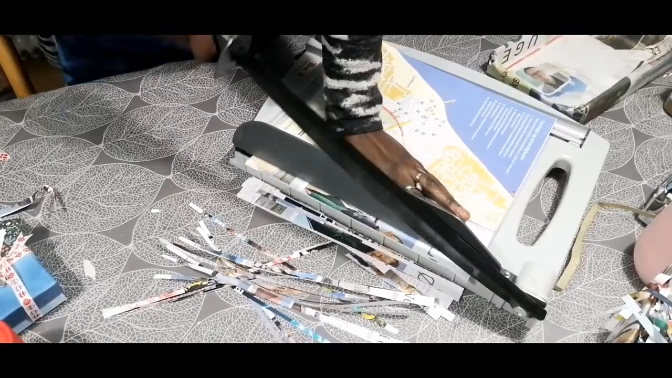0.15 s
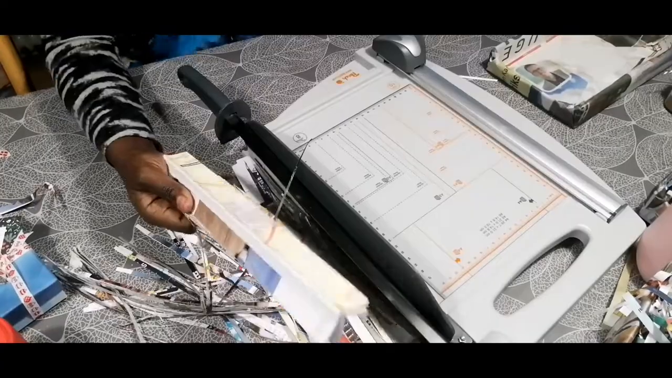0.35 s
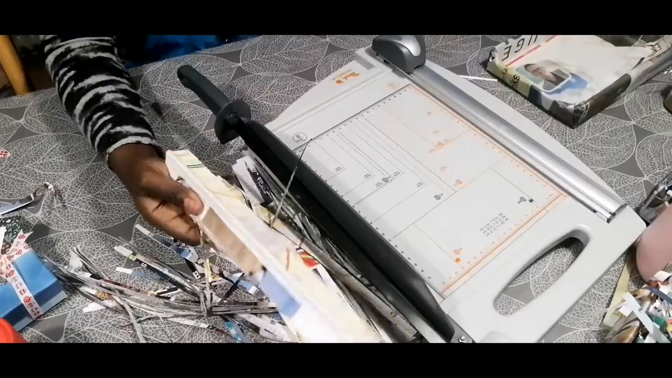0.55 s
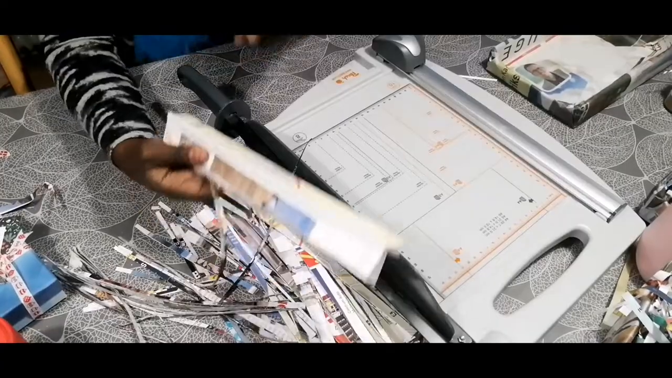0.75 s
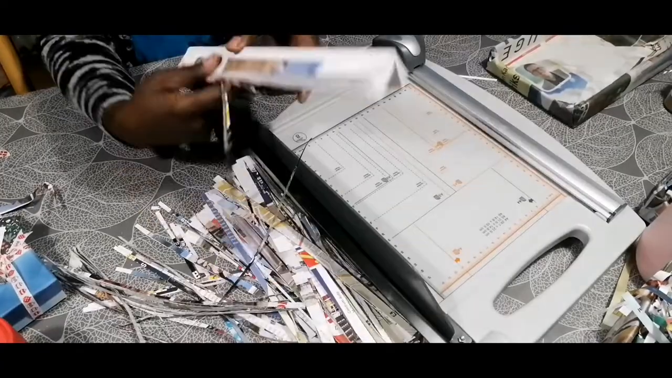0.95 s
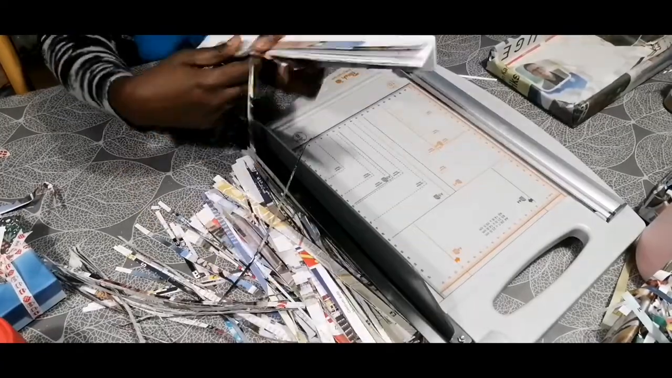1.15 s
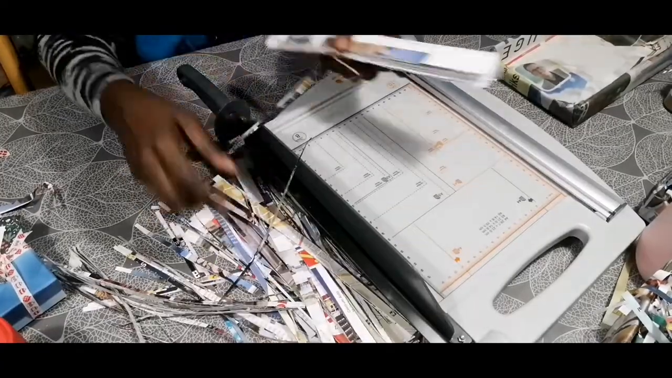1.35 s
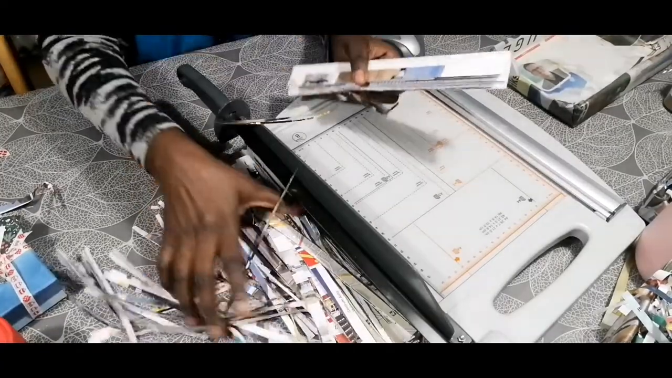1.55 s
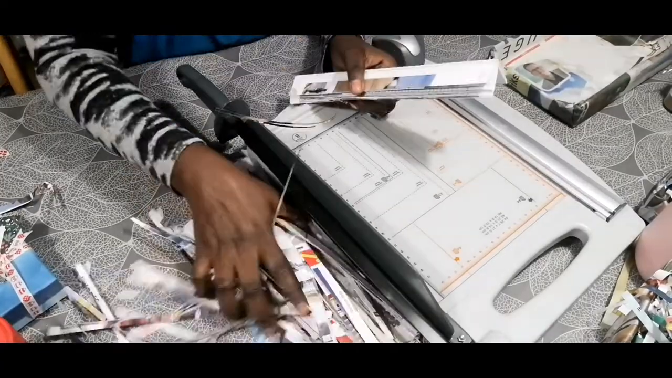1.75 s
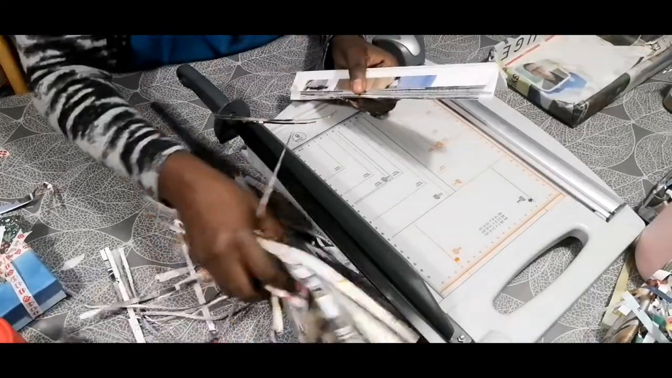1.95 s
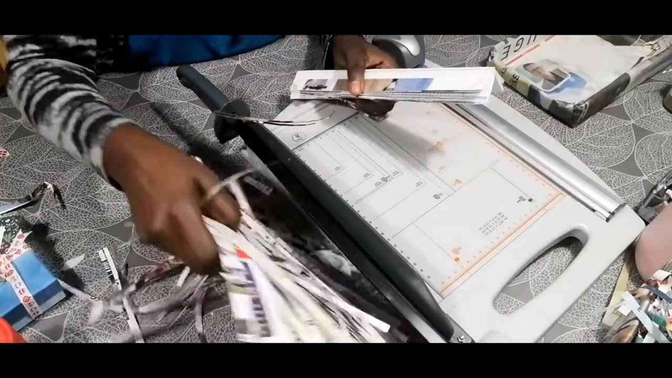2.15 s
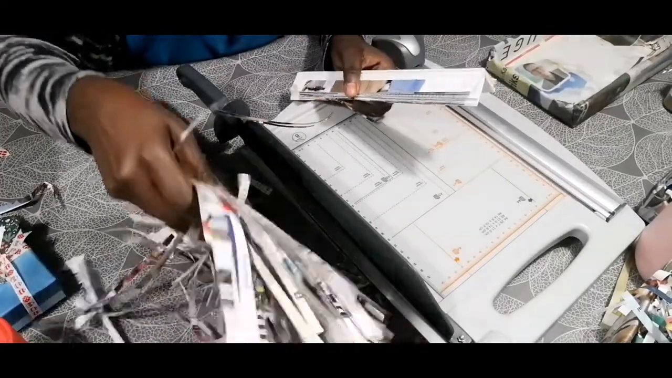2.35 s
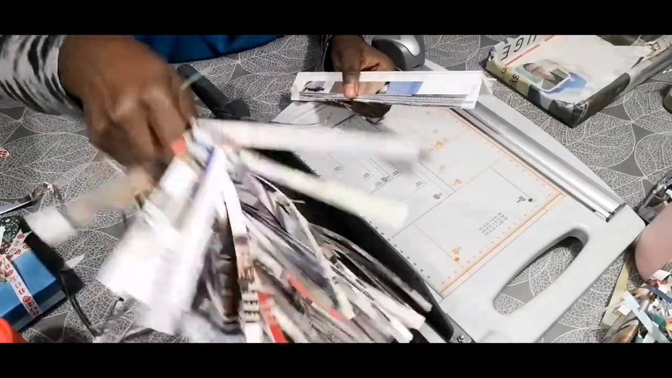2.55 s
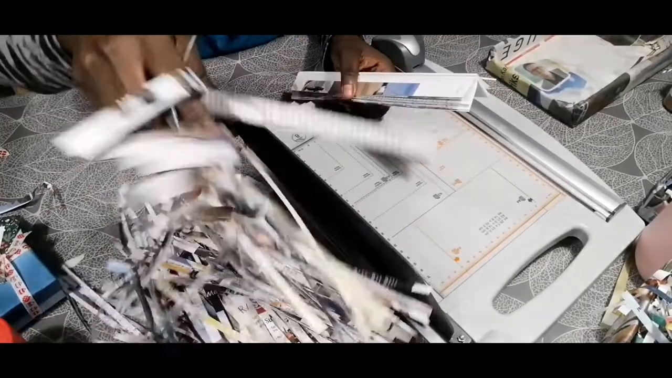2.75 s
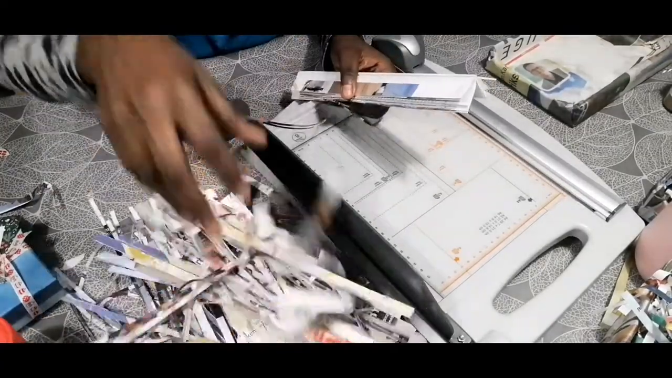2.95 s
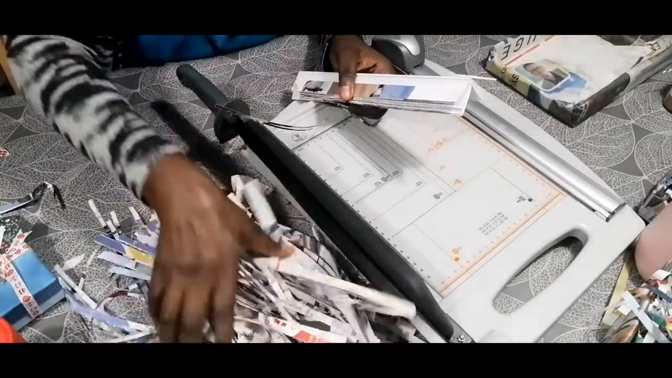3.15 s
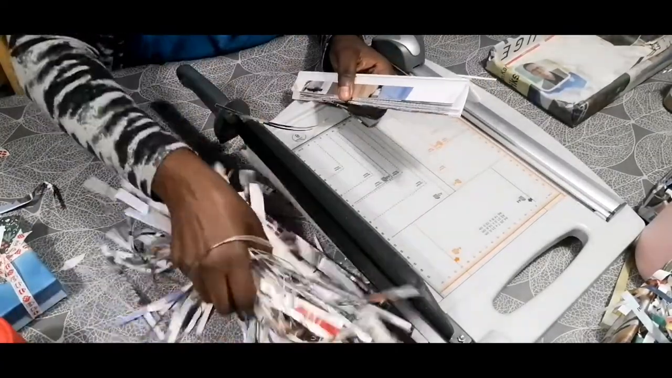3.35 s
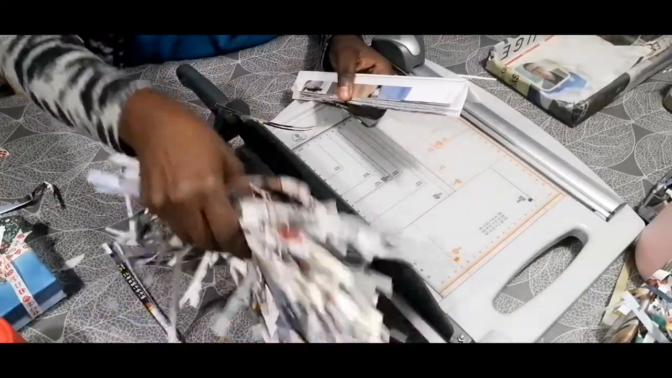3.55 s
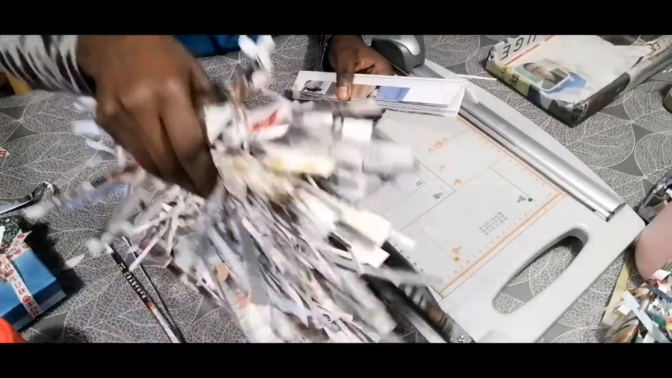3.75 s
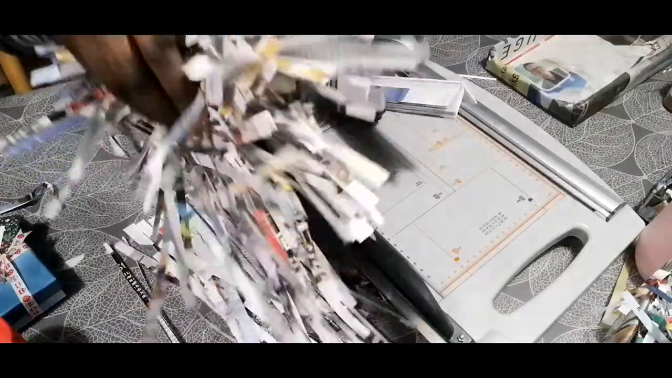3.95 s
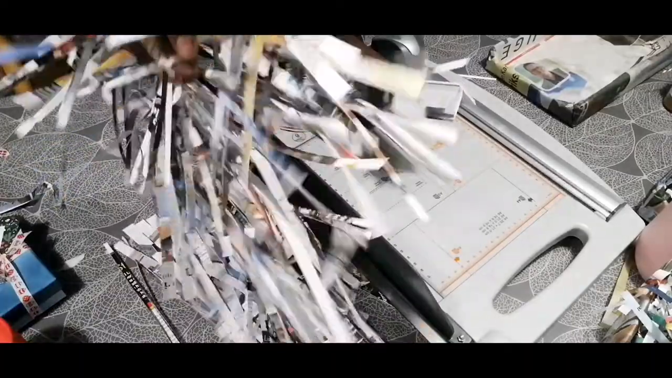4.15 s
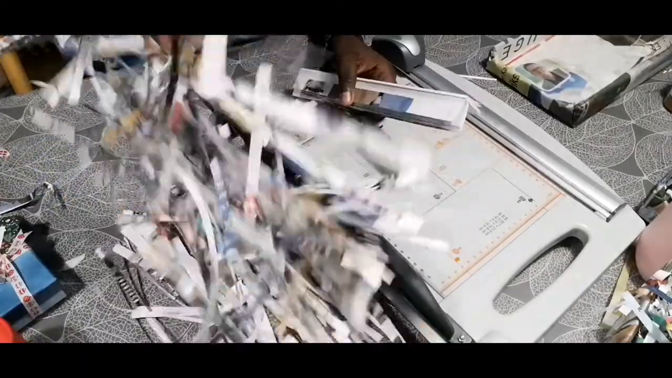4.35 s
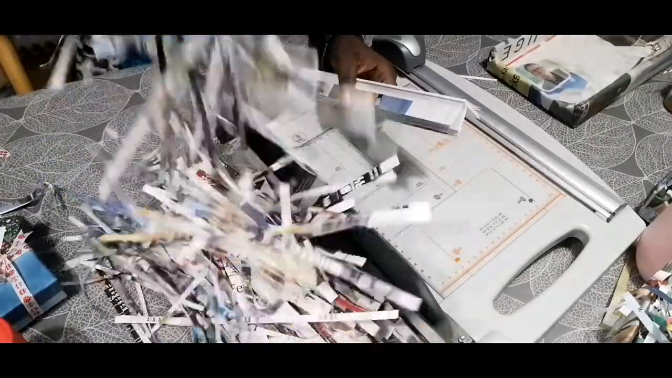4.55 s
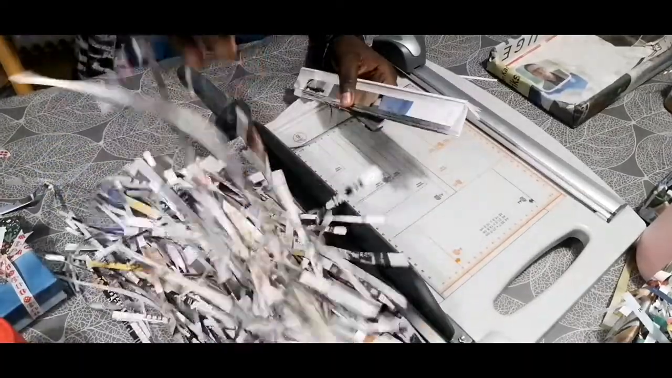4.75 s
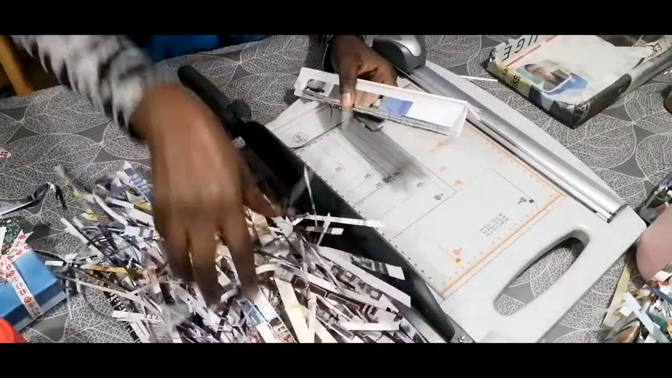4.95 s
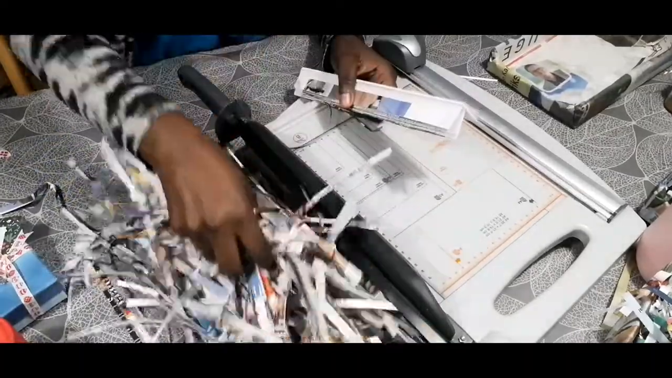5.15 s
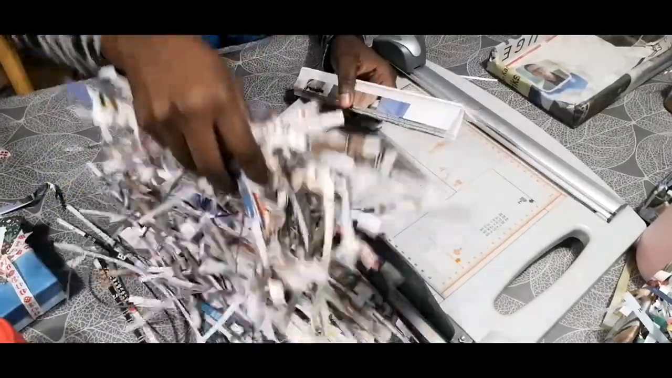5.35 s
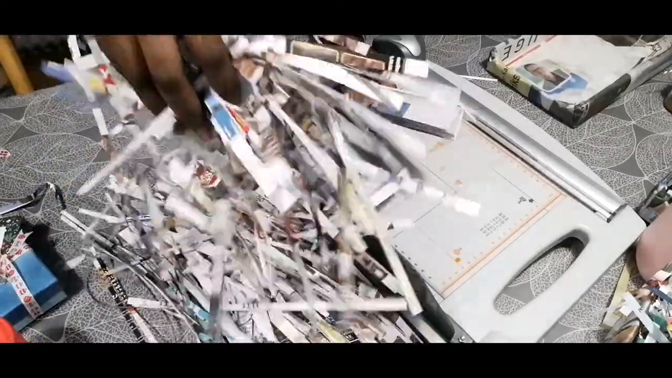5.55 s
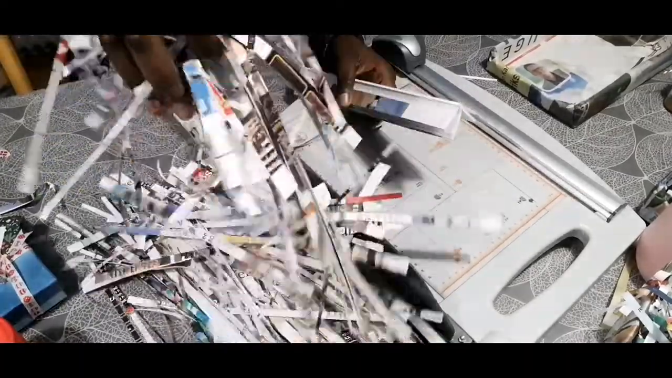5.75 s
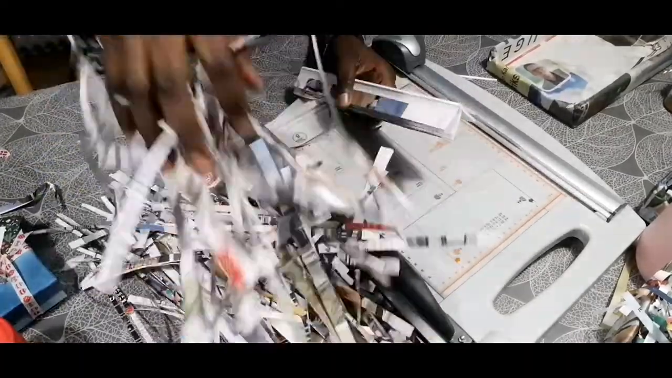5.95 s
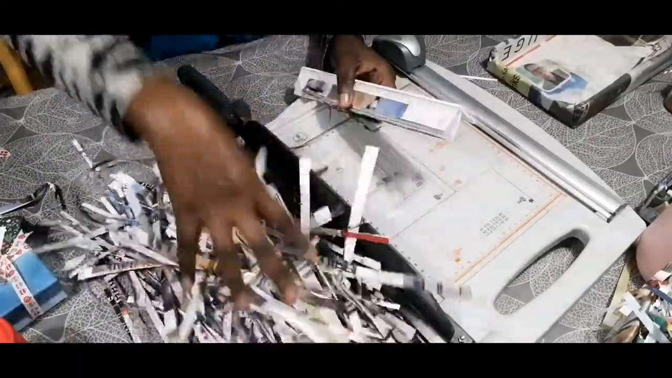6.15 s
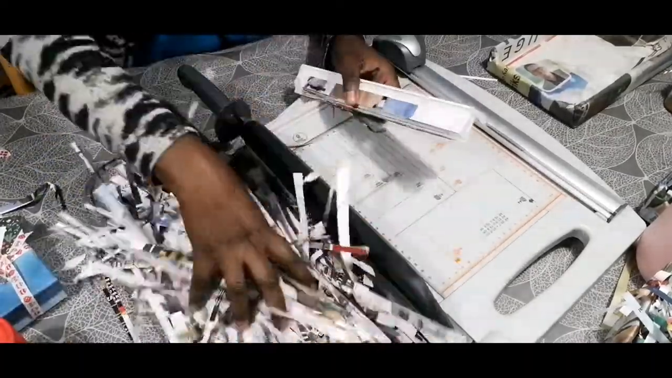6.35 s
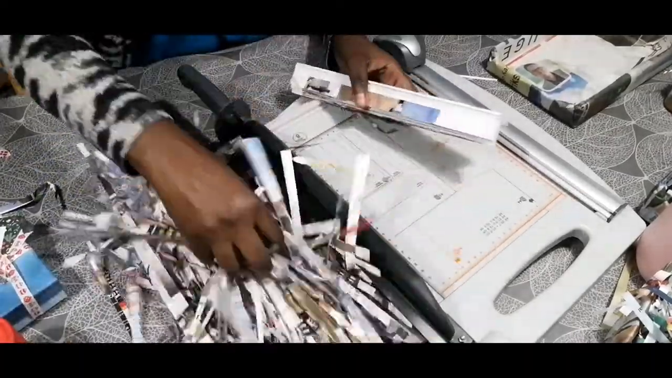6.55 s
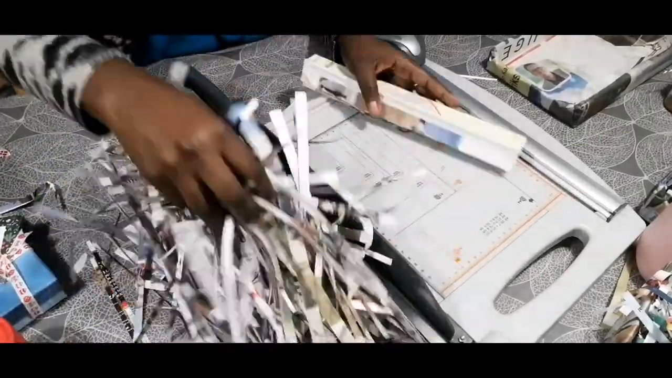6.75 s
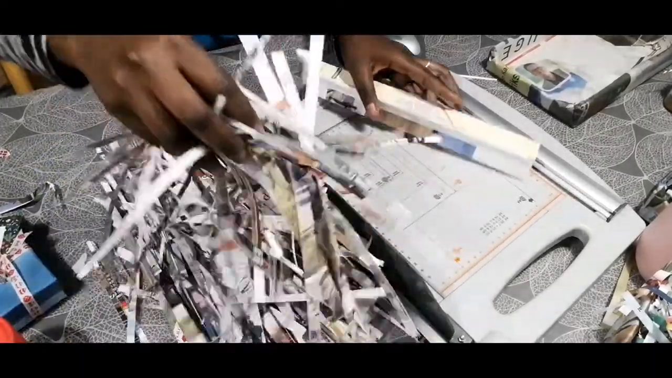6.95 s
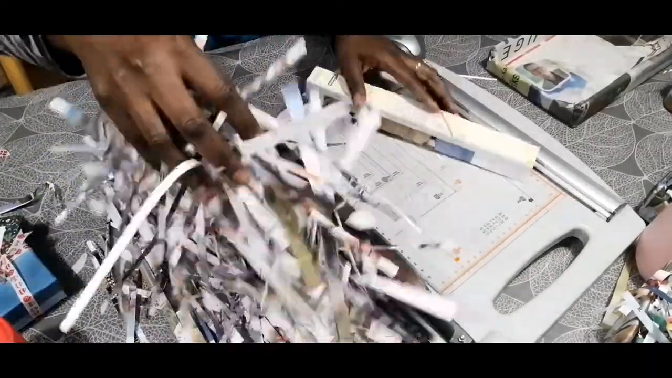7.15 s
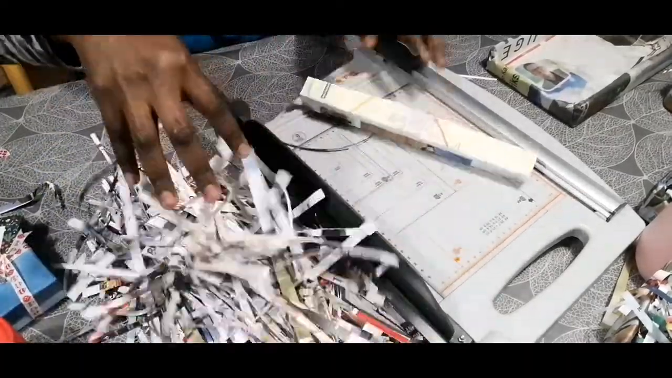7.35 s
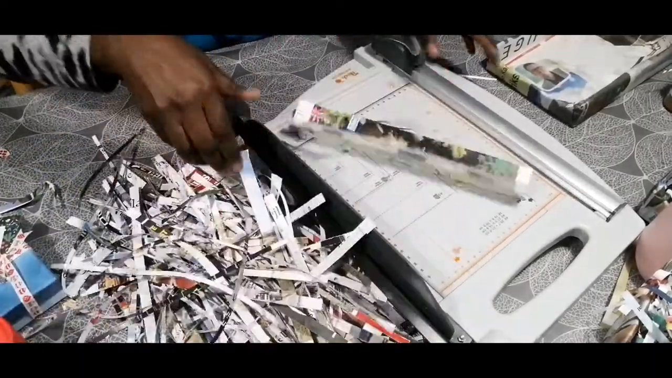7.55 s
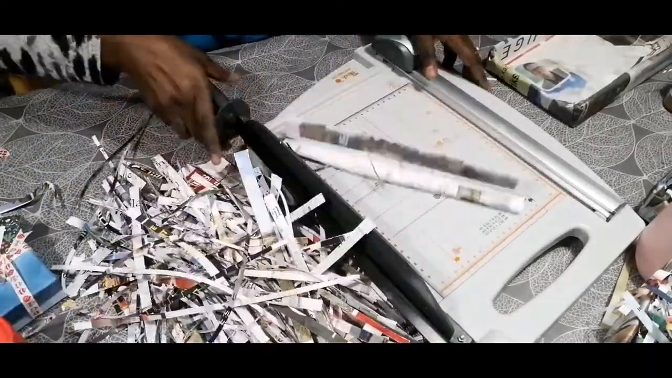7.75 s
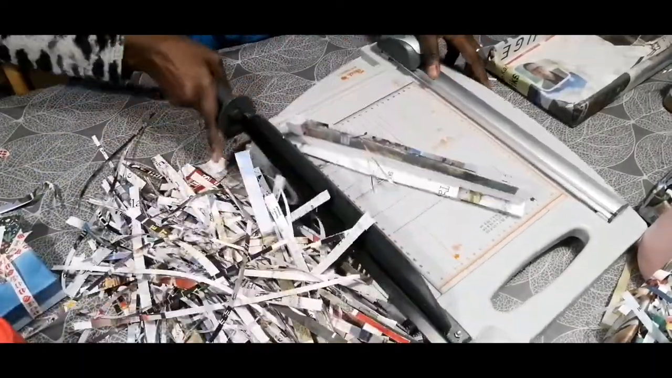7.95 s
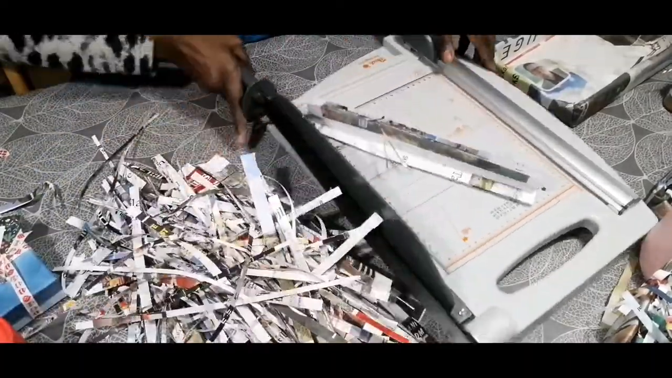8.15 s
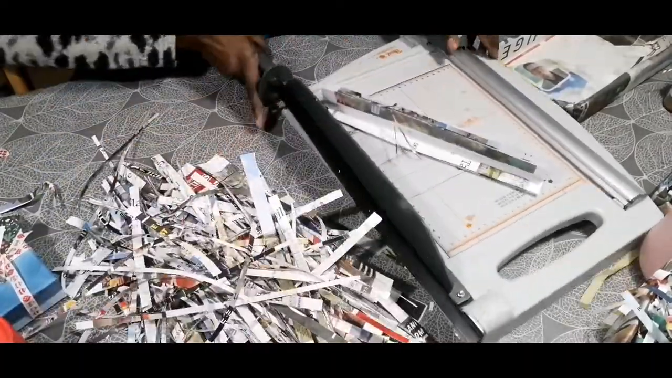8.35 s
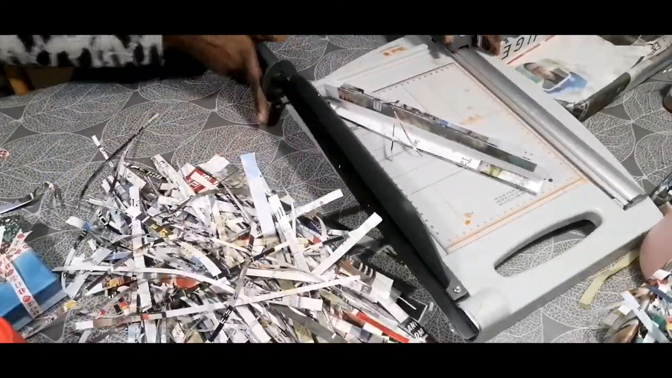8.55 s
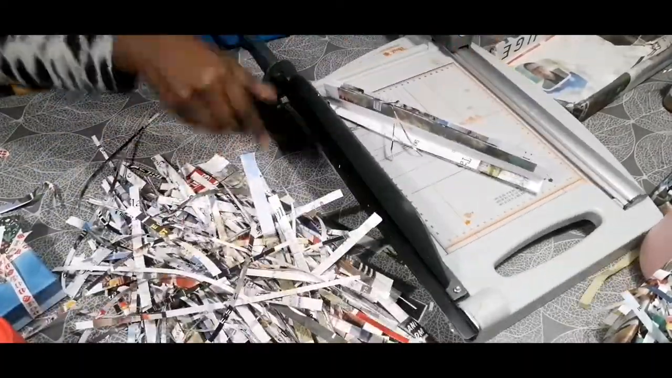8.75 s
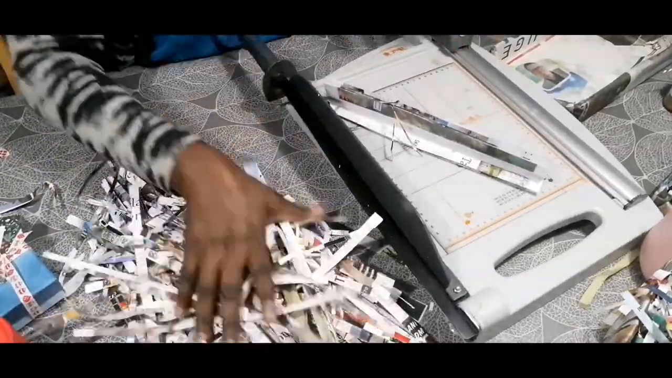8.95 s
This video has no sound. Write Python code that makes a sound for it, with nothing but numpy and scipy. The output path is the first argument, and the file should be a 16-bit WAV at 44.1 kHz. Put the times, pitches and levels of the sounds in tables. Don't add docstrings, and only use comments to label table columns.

```python
import sys
import numpy as np
from scipy import signal
from scipy.fft import rfft, irfft, next_fast_len
from scipy.io import wavfile
from scipy.ndimage import uniform_filter1d

SR = 44100
rng = np.random.default_rng(int(sys.argv[2]) if len(sys.argv) > 2 else 0)


def volts_from_db(level):
    exponent = np.asarray(level, float) / 20
    return 10 ** exponent


def inscribe(sig):
    pcm = np.round(np.clip(np.atleast_2d(sig).T, -1, 1) * 32767)
    wavfile.write(sys.argv[1], SR, pcm.astype(np.int16))


N = 397341
SCENE_CHANGE_S = 0.4805
BASE_LAG_S, TABLE_LAG_S = 0.00018, 0.00005


# t/s, base drive level/dB, shearing level/dB
BLADE_STROKE = [
    (0.06, -59, -96),
    (0.072, -38.5, -54.5),
    (0.154, -27.5, -46),
    (0.392, -22, -40),
    (0.41, -13.5, -41),
    (0.46, -30, -45),
    (0.48, -22, -46),
]
# t/s, peak level/dB, contact/ms
BLADE_SLIPS = [(0.074, -29, 0.25), (0.086, -45, 0.42), (0.102, -34.5, 0.29), (0.126, -24.5, 0.19),
               (0.139, -25.5, 0.42), (0.16, -25, 0.1), (0.185, -22.5, 0.069), (0.21, -26, 0.067),
               (0.23, -21, 0.058), (0.254, -31, 0.086), (0.271, -20.5, 0.14), (0.294, -17, 0.23),
               (0.311, -15, 0.035), (0.333, -27.5, 0.12), (0.35, -19, 0.21), (0.365, -15.5, 0.15),
               (0.375, -12, 0.21), (0.386, -6.5, 1), (0.397, -8.5, 0.42), (0.411, -45, 0.23),
               (0.418, -25.5, 1), (0.439, -16.5, 0.21), (0.446, -14.5, 0.23), (0.455, -22, 0.21),
               (0.464, -22.5, 0.29)]
# f/Hz, level/dB, t60/s
CLAMPED_BASE_MODES = [(109.3, -10, 0.02), (157, -7.5, .12), (212, -14.5, 0.11), (262.7, -7, 0.14),
                      (366.8, -2, 0.091), (413, -4.5, 0.037), (550, -9.5, 0.017), (771, -11.5, 0.044),
                      (801, -20.5, 0.16), (924, -10.5, 0.039), (1213, -20, 0.05), (1454, -15, 0.0077),
                      (2080, -17.5, 0.021)]
# f/Hz, level/dB per Hz
PAPER_COLOUR = [(900, -1), (1500, -0.5), (2500, 3), (3300, 6.5), (4500, 4.5), (6000, -1.5), (8000, -7),
                (11000, -9), (15000, -18.5)]


def cut():
    drive_db, shear_db = in_time(BLADE_STROKE)
    _, slip_db, contact_ms = np.transpose(BLADE_SLIPS)
    slips = contacts(BLADE_SLIPS, slip_db, contact_ms, rough=0.62)

    rub_noise = evened(grains(1200, 1.5, 0.02)) * rng.standard_normal(N)
    rub = volts_from_db(drive_db) * signal.lfilter([0.1], [1, -0.9], rub_noise)
    drive = volts_from_db(-7.5) * slips + volts_from_db(-31) * rub
    body = ring(drive, CLAMPED_BASE_MODES, scatter_db=0.74, sign=-1.138, bass_hz=93)

    fibres = evened(grains(2500, 2.1, 0.02))
    shear = volts_from_db(shear_db) * bands(fibres, PAPER_COLOUR, 1390, 16700, count=9, patchy_db=1.5)
    return ports(body, BASE_LAG_S, -1.5), shear


# peak t/s, crackle level/dB, swell/s, fade/s
HEAP_MOVES = [(1.7, -53, 0.18, 0.31), (1.85, -40, 0.33, 0.21), (1.97, -38.5, 0.33, 0.1),
              (2.09, -43, 0.18, 0.22), (2.5, -49.5, 0.8, .2), (2.59, -40, 0.095, 0.091),
              (2.72, -44.5, 0.49, 0.13), (2.9, -40, 0.071, 0.13), (2.97, -60.5, .1, 0.32),
              (3.19, -41, 0.027, 0.27), (3.34, -35.5, 0.11, 0.16), (3.61, -48.5, 1, 0.1),
              (3.78, -48, .25, 0.04), (3.9, -52.5, .4, 0.27), (4.22, -49, 0.5, .15),
              (4.38, -39.5, 0.16, 0.21), (4.58, -47.5, 0.6, 0.058), (4.75, -40.5, 0.15, 0.11),
              (5.025, -35.5, 0.038, 0.25), (5.33, -45, 0.46, 0.29), (5.72, -46.5, 0.29, 0.091),
              (5.92, -53, .35, 0.09), (6.11, -41.5, .2, 0.084), (6.28, -41.5, 0.064, 0.11),
              (6.37, -48.5, .15, .2), (6.46, -39.5, 0.11, .2), (6.62, -46.5, .3, 0.56),
              (6.93, -51, 1, 0.17), (7.31, -45, .4, 0.18), (8.94, -43.5, 0.046, 0.14)]
# peak t/s, crackle level/dB, swell/s, fade/s, swish over crackle/dB
SHEET_MOVES = [(0.488, -51, 0.013, 0.047, -3.5), (0.659, -73, 0.38, .5, -4), (0.88, -59, 0.4, 0.13, -4),
               (1.04, -56, 0.16, 0.035, -3.5), (1.064, -50, 0.0095, 0.13, 7.5),
               (1.21, -38, 0.017, 0.027, -30), (1.29, -59, 0.054, 0.11, 5), (1.51, -48, .025, 0.23, -24),
               (6.32, -47.5, 0.027, 0.018, 9), (7.49, -56, 0.15, 0.069, -21),
               (7.53, -50, 0.007, 0.061, 3.5), (7.76, -57, 0.054, .1, -3.5),
               (7.82, -51.5, 0.048, 0.056, -7), (7.913, -59.5, 0.015, 0.036, 26),
               (8.0, -49.5, 0.067, 0.52, -3.5), (8.24, -51.5, 0.15, 0.29, -0.2),
               (8.6, -60.5, .012, 0.064, -7)]
# f/Hz, level/dB per Hz
SHEET_COLOUR = [(700, -7), (1900, 2.5), (4400, 2)]
HEAP_SWISH_DB, HEAP_HISS_DB, SHEET_HISS_DB = -7, -8.5, -15


def rustle():
    heap, sheets = moves(HEAP_MOVES), moves(SHEET_MOVES)
    sheet_swish = moves(SHEET_MOVES, [row[-1] for row in SHEET_MOVES])
    clumps = volts_from_db(2.2 * drift(30))
    wash = evened(grains(1500 * clumps, 2.4, 0.09))
    ticks = rms_one(grains(260 * clumps, 2.8, 0.004))
    grain = evened(wash + 0.35 * ticks)

    swish = volts_from_db(HEAP_SWISH_DB) * heap * bands(grain, PAPER_COLOUR, 710, 4340, count=6, patchy_db=4.0)
    swish = swish + sheet_swish * bands(wash, SHEET_COLOUR, 735, 5200, count=5, patchy_db=0.5)

    crackle_gain = volts_from_db(-5.5) * np.hypot(heap, sheets)
    crackle = crackle_gain * bands(grain, PAPER_COLOUR, 4200, 9500, count=4, patchy_db=2.4)

    hiss_gain = np.hypot(volts_from_db(HEAP_HISS_DB) * heap, volts_from_db(SHEET_HISS_DB) * sheets)
    hiss = hiss_gain * bands(grain, PAPER_COLOUR, 7510, 16500, count=3, patchy_db=-2.5)
    return swish + crackle + hiss


# t/s, peak level/dB, low part level/dB, pan/dB
STRIP_SNAPS = [(0.8899, -31, -48, 9.5), (0.9855, -34.5, -78, 13), (1.2083, -22.5, -38, -3),
               (1.494, -57, -49.5, 6), (1.8412, -25, -35, 9), (1.9362, -30, -31, 5),
               (2.337, -34, -52.5, 12), (2.5914, -18.5, -26.5, 1), (2.8807, -41, -40, -3),
               (2.9133, -18, -61, 0), (3.02, -33, -61, 1), (3.5929, -23, -64, -0.6), (3.9161, -33, -71, 4),
               (4.0672, -30.5, -57, 2), (4.2117, -25, -76, -14), (4.431, -35, -52, -0.6),
               (4.4985, -26, -40, -9), (4.9868, -34, -63, 7), (5.5957, -30.5, -66, -1),
               (5.6573, -25, -58, 2), (5.8355, -30.5, -57, 0), (5.8784, -28, -42, -5),
               (6.1696, -25.5, -58, 4), (6.2708, -26.5, -54, -3), (6.998, -31, -58, 3),
               (7.261, -17.5, -67, -5), (7.7976, -35, -47.5, 13), (7.897, -13, -42, -1),
               (8.2604, -24.5, -55, 0), (8.9017, -34, -64, 5)]


def snaps():
    high, low = np.zeros((2, 2, N + 4000))
    t = np.arange(4000) / SR
    for s, high_db, low_db, pan_db in STRIP_SNAPS:
        crack = 0.75 * np.exp(-t / 0.0004) * np.sign(rng.standard_normal(len(t)))
        fizz = 0.22 * np.exp(-t / 0.005) * rng.standard_normal((2, len(t)))
        burst = (crack + fizz) * pan(pan_db)
        at = round(s * SR)
        high[:, at:at + len(t)] += volts_from_db(high_db - 1.5) * burst
        low[:, at:at + len(t)] += volts_from_db(low_db + 17) * burst
    high = signal.sosfilt(signal.butter(1, [4500, 9000], "band", fs=SR, output="sos"), high + 1e-18)
    low = signal.sosfilt(signal.butter(2, [2000, 4200], "band", fs=SR, output="sos"), low + 1e-18)
    return (high + low)[:, :N]


# peak t/s, level/dB, swell/s, fade/s
PATTER_MOVES = [(0.88, -59.5, 0.22, .06), (1.07, -56, 0.017, 0.091), (1.33, -58, 0.061, 0.16),
                (1.52, -65, 0.012, 0.067), (1.69, -54, 0.07, 0.32), (2.72, -64.5, 0.27, .1),
                (2.95, -59.5, 0.056, 0.25), (3.28, -60, 0.11, .2), (4.39, -56, 0.18, 0.2),
                (4.58, -55.5, .3, 0.19), (4.71, -55.5, 0.12, 0.11), (5.16, -62, 0.19, 0.25),
                (5.73, -60, 0.12, 0.085), (6.11, -66, 0.3, 0.044), (6.32, -52.5, 0.054, 0.06),
                (6.58, -62.5, 0.26, 1), (7.15, -71, 0.48, 1), (7.54, -41, 0.015, 0.039),
                (7.71, -64, 0.13, 0.061), (7.84, -47.5, 0.13, 0.022), (7.96, -41.5, 0.018, 0.058),
                (8.1, -50.5, 0.34, 0.36), (8.27, -53.5, 0.22, 0.21)]
# f/Hz, level/dB, t60/s
BASE_MODES = [(268.7, -8.5, 0.24), (340.3, -15.5, 0.25), (378.3, -8.5, 0.2), (434, -12, 0.11),
              (520, -4.5, 0.049), (545.5, -6, 0.07), (613, -7, 0.087), (687, -10.5, 0.22),
              (707, -5.5, 0.048), (834.5, -3, 0.033), (914, -5, 0.061), (1022, -10.5, 0.094),
              (1098, -10.5, 0.059), (1330, -2, 0.015), (1750, -11, 0.044), (2350, -14, 0.021),
              (2700, -23, .02)]
HEAP_PATTER_DB = -30.5


def patter():
    taps = evened(grains(600, 2.5, 0.02)) * rng.standard_normal(N)
    gain = np.hypot(moves(PATTER_MOVES), volts_from_db(HEAP_PATTER_DB) * moves(HEAP_MOVES))
    body = gain * rms_one(ring(taps, BASE_MODES, scatter_db=2.5, sign=-1, bass_hz=150))
    return ports(body, BASE_LAG_S, -2.6)


# t/s, table level/dB, base level/dB, contact/ms
LANDINGS = [(0.574, -45, -68, 0.21), (0.742, -44.5, -70, 0.27), (1.054, -25.5, -36, 0.54),
            (1.066, -18.5, -64, 0.88), (1.085, -20, -33.5, 0.57), (1.096, -20.5, -44, 0.29),
            (1.15, -55, -43.5, 0.34), (1.284, -39, -30.5, 1.1), (1.311, -81, -44.5, 0.38),
            (1.611, -46.5, -51, 0.22), (2.996, -58, -42, 0.033), (3.18, -30.5, -50, 0.25),
            (3.203, -62, -39, 0.73), (4.505, -72, -37.5, 0.047), (4.591, -59, -38, 0.096),
            (5.02, -20.5, -26.5, 0.7), (5.031, -68, -33, 0.95), (6.308, -45.5, -46, 0.076),
            (6.796, -48, -37.5, 0.25), (7.227, -73, -39, 0.39), (7.524, -52, -20, 0.27),
            (7.535, -29, -19, 0.61), (7.564, -45.5, -18.5, 0.54), (7.619, -62, -16, 2),
            (7.812, -45, -34.5, 0.32), (7.86, -19, -21, 1.24), (7.911, -44, -27.5, 0.041),
            (7.98, -37, -30.5, 0.55), (8.156, -39, -47, 0.091), (8.268, -45, -40, 0.14)]
# f/Hz, level/dB, t60/s
TABLE_MODES = [(52, -9, 0.16), (77.7, -14.5, 0.68), (98.4, -0.5, 0.36), (116, 1, 0.25), (156, -1, 0.23),
               (196, -0.5, 0.11), (224, -13.5, 0.36), (310, -5, 0.12)]


def thumps():
    _, table_db, base_db, contact_ms = np.transpose(LANDINGS)
    table_push = contacts(LANDINGS, table_db - 13, contact_ms, rough=1.0)
    base_push = contacts(LANDINGS, base_db - 3, contact_ms, rough=0.8)
    table = ring(table_push, TABLE_MODES, scatter_db=0.25, sign=0.94, bass_hz=81)
    base = ring(base_push, BASE_MODES, scatter_db=1.8, sign=-1, bass_hz=150)
    return ports(table, TABLE_LAG_S, 0.5) + ports(base, BASE_LAG_S, -2.6)


def room(x):
    t60_s, wall_cut_hz, bass_hz = 0.43, 13500, 383
    x = signal.sosfilt(signal.butter(1, bass_hz, "high", fs=SR, output="sos"), x)
    size = next_fast_len(N + SR)
    w = 2 * np.pi * np.arange(size // 2 + 1) / size
    dull = 1 / (1 + 1j * w * SR / (2 * np.pi * wall_cut_hz))
    out = np.zeros((2, N))
    for side in range(2):
        response = 0
        for k, lag_s in enumerate(rng.uniform(0.0066, 0.036, 6)):
            loop = volts_from_db(-60 * lag_s / t60_s) * dull * np.exp(-1j * w * lag_s * SR)
            response = response + (-1) ** k * loop / (1 - loop)
        out[side] = irfft(rfft(x[side], size) * response, size)[:N]
    return out


# f/Hz, level/dB per Hz
HUSH_COLOUR = [(12, -32), (20, 4), (53, -8.5), (80, -5), (129, -11.5), (171, -7), (298, -16), (491, -12.5),
               (631, -19.5), (4190, -32.5), (7110, -43), (8880, -34), (15500, -36)]


def hush():
    return volts_from_db(-66) * bands(1, HUSH_COLOUR, 21.4, 17100, count=19, patchy_db=0.0)


def contacts(rows, level_db, contact_ms, rough):
    force, t = np.zeros(N), np.arange(2000) / SR
    for (s, *_), db, ms in zip(rows, level_db, contact_ms):
        push = np.exp(-t * 1000 / np.clip(ms, 0.03, 5))
        chatter = np.exp(-t / 0.012) * rng.standard_normal(len(t))
        chatter = chatter / np.sqrt(np.sum(chatter ** 2))
        chatter = signal.fftconvolve(chatter, push)[:len(t)]
        at = round(s * SR)
        force[at:at + len(t)] += volts_from_db(db) * (push + rough * chatter) / push.sum()
    return force


def ring(drive, modes, scatter_db, sign, bass_hz):
    out = 0
    for k, (hz, level_db, t60_s) in enumerate(modes):
        r, w = volts_from_db(-60 / (t60_s * SR)), 2 * np.pi * hz / SR
        coupled = drive * volts_from_db(level_db + scatter_db * drift(35.4)) + 1e-18
        mode = signal.lfilter([0, np.sin(w)], [1, -2 * r * np.cos(w), r * r], coupled)
        out = out + sign ** k * mode
    return signal.sosfilt(signal.butter(2, bass_hz, "high", fs=SR, output="sos"), out)


def grains(per_s, spread_db, t60_s):
    sizes = volts_from_db(spread_db * np.minimum(rng.exponential(1, N), 5))
    born = rng.random(N) < per_s / SR
    return signal.lfilter([1], [1, -volts_from_db(-60 / (t60_s * SR))], sizes * born + 1e-18)


# f/Hz, likeness/0-1
PORT_LIKENESS = [(30, 0.2), (80, 0.38), (300, 0.38), (700, 0.9), (1400, 0.63), (3000, 0), (15000, 0)]
# f/Hz, left over right level/dB
PORT_BALANCE = [(30, -0.5), (150, -2), (600, 1.5), (1200, -0.4), (5000, 1.3), (7500, 2.5), (9500, -8),
                (12000, 5.5), (15000, 9)]


def bands(envelope, spectrum, low_hz, high_hz, count, patchy_db):
    out, edges = 0, np.geomspace(low_hz, high_hz, count + 1)
    white = envelope * rng.standard_normal((2, 2, N))
    for k, (low, high) in enumerate(zip(edges, edges[1:])):
        band = signal.butter(2, [low, min(high, 0.45 * SR)], "band", fs=SR, output="sos")
        mid, side = signal.sosfilt(band, white[k % 2])
        hz = np.sqrt(low * high)
        alike = np.clip(at_hz(PORT_LIKENESS, hz), 0, 1)
        gain = volts_from_db(at_hz(spectrum, hz) + patchy_db * drift(42)) * pan(at_hz(PORT_BALANCE, hz))
        out = out + gain * (np.sqrt(1 + alike) * mid + np.sqrt(1 - alike) * side * [[1], [-1]])
    return rms_one(out)


def moves(rows, offset_db=0):
    curve = 1.298
    t, power = np.arange(0, N + 40, 40) / SR, 0
    for (s, db, swell_s, fade_s, *_), extra_db in zip(rows, np.broadcast_to(offset_db, len(rows))):
        away = np.where(t < s, (s - t) / swell_s, (t - s) / fade_s)
        power = power + volts_from_db(2 * (db + extra_db - 20 * away ** curve))
    now = np.arange(N) / SR
    return np.interp(now, t, np.sqrt(power)) * (now > SCENE_CHANGE_S)


def in_time(rows):
    s, *columns = np.transpose(rows)
    return [np.interp(np.arange(N) / SR, s, c, left=-120, right=c[-1]) for c in columns]


def evened(envelope):
    return envelope / np.sqrt(uniform_filter1d(envelope ** 2, size=3000) + 1e-12)


def drift(rate_hz):
    r = np.exp(-80 * np.pi * rate_hz / SR)
    noise = rng.standard_normal(N // 40 + 2002)
    slow = signal.lfilter([1], [1, -2 * r, r * r], noise)[2000:]
    return np.interp(np.arange(N) / 40, np.arange(len(slow)), rms_one(slow))


def at_hz(points, hz):
    points_hz, values = np.transpose(points)
    return np.interp(np.log(hz), np.log(points_hz), values)


def rms_one(x):
    return x / np.sqrt(np.mean(x ** 2) + 1e-20)


def pan(pan_db):
    return volts_from_db([[pan_db / 2], [-pan_db / 2]])


def ports(x, lag_s, pan_db):
    t = np.arange(N) / SR
    return np.array([np.interp(t - lag_s, t, x), x]) * pan(pan_db)


def scene():
    body, shear = cut()
    blade = body + shear
    before = np.clip((SCENE_CHANGE_S - np.arange(N) / SR) / 0.0017, 0, 1)
    first = (blade + volts_from_db(-19) * room(blade)) * before
    handling = rustle() + snaps() + patter() + thumps()
    return first + handling + volts_from_db(-12) * room(handling) + hush()


def band_limit(x):
    return signal.sosfilt(signal.butter(12, 16470, fs=SR, output="sos"), x)


# f/Hz, width/Hz, level/dB
PORT_RESONANCES = [(7150, 1730, 14.5), (4200, 1180, -9), (14800, 1200, 5)]


def record(dry):
    x = dry
    for hz, width_hz, peak_db in PORT_RESONANCES:
        w = 2 * np.pi * hz / SR
        a, g = np.sin(w) * width_hz / (2 * hz), volts_from_db(peak_db / 2)
        x = signal.lfilter([1 + a * g, -2 * np.cos(w), 1 - a * g], [1 + a / g, -2 * np.cos(w), 1 - a / g], x)
    x = signal.sosfilt(signal.cheby2(16, 50, 15800, fs=SR, output="sos"), x)
    return band_limit(x)


dry = scene()
out = record(dry)
inscribe(out)
```